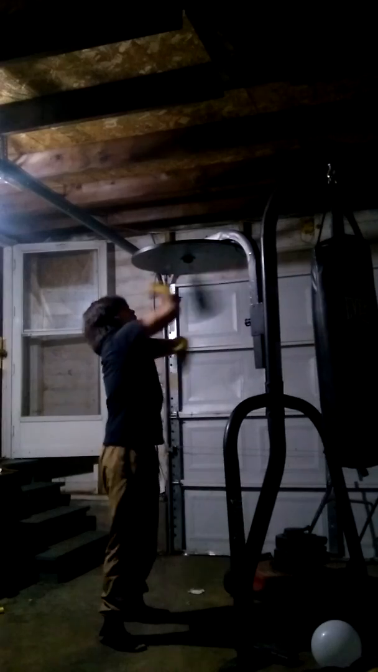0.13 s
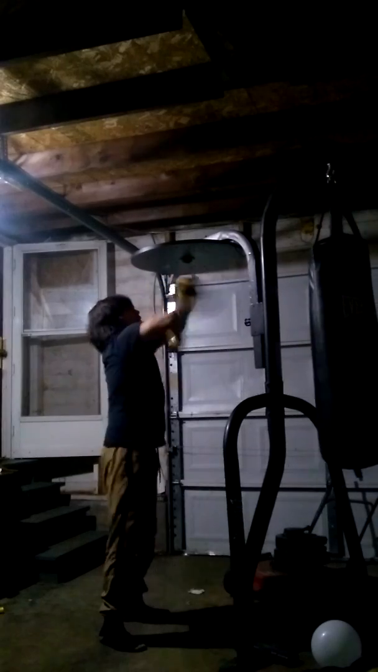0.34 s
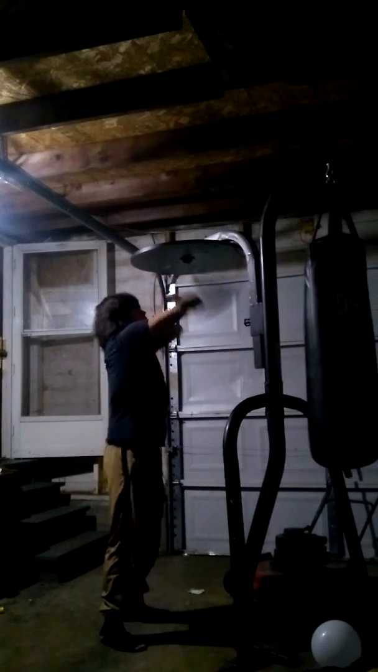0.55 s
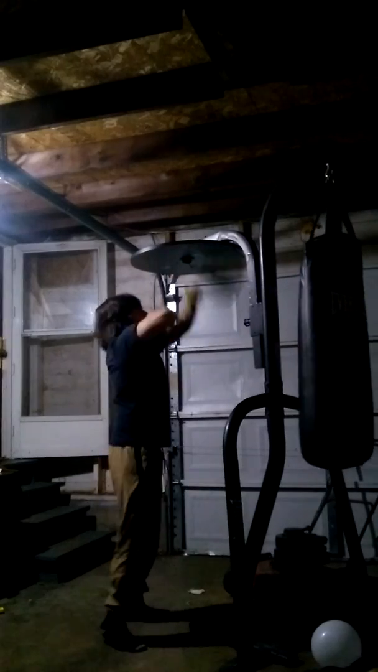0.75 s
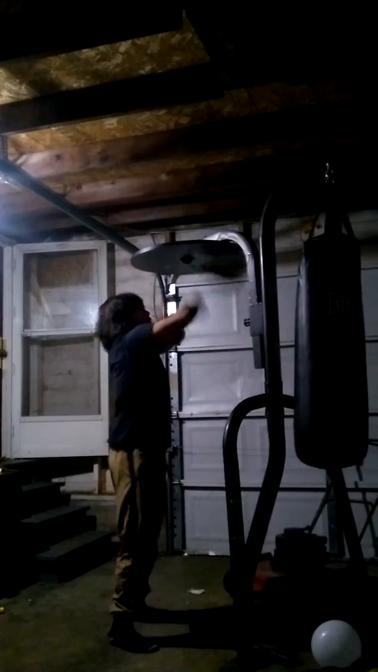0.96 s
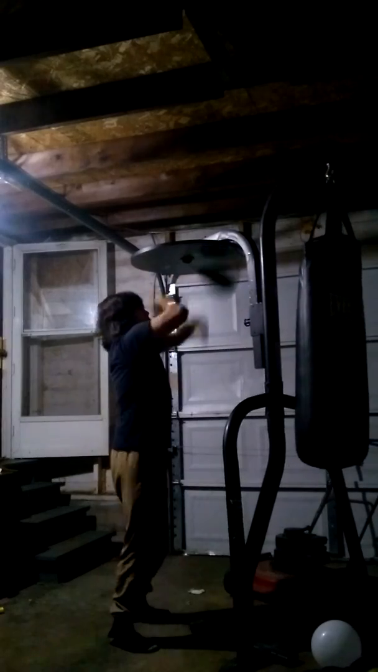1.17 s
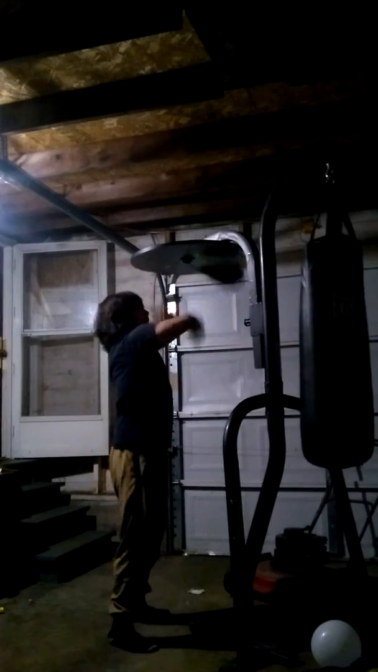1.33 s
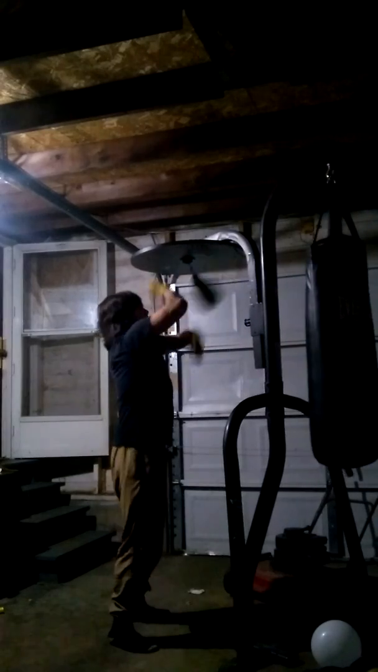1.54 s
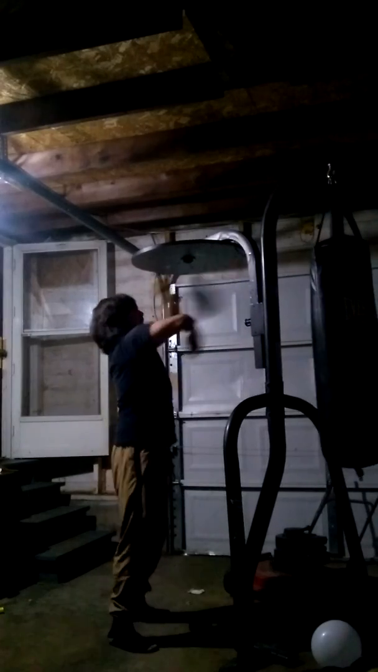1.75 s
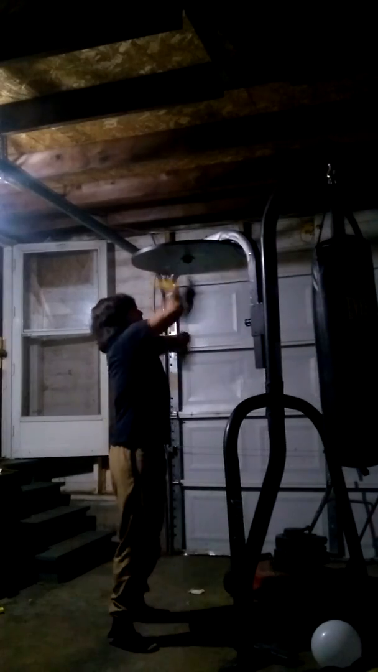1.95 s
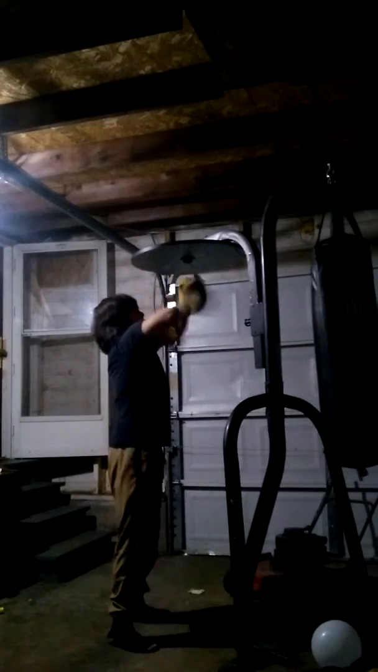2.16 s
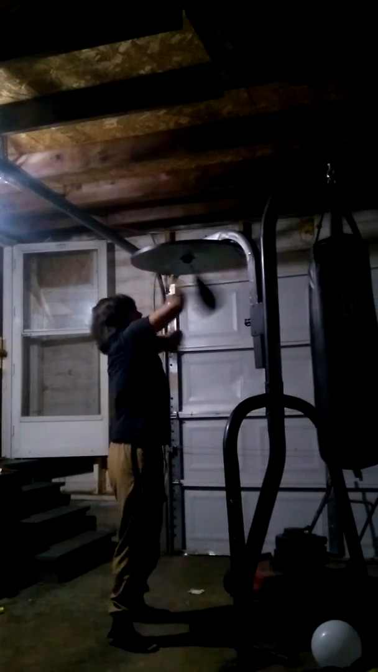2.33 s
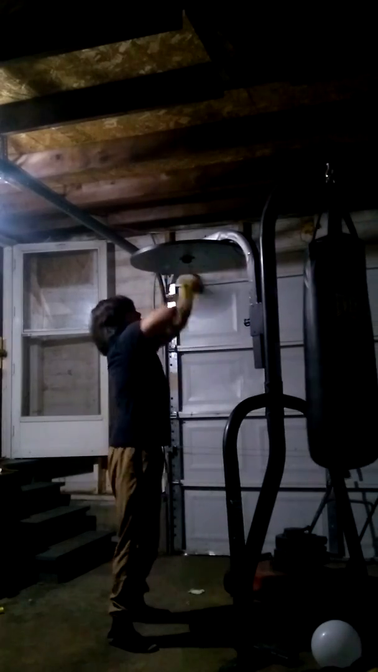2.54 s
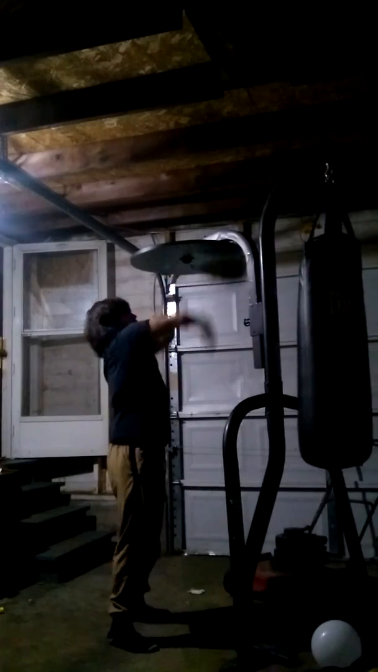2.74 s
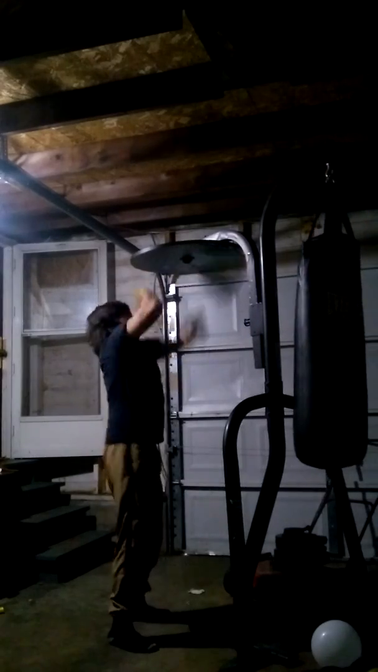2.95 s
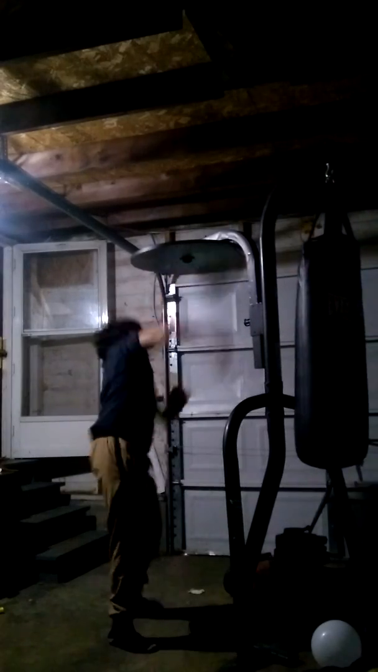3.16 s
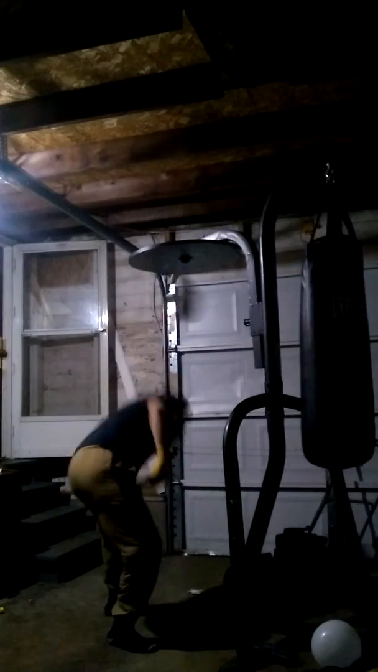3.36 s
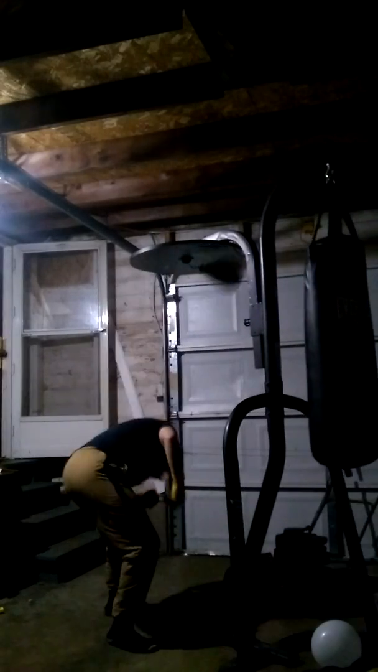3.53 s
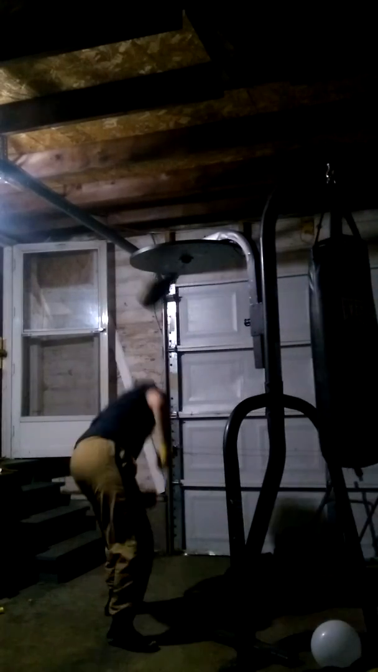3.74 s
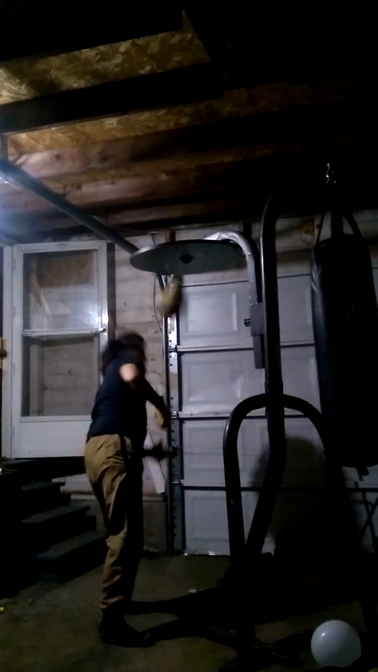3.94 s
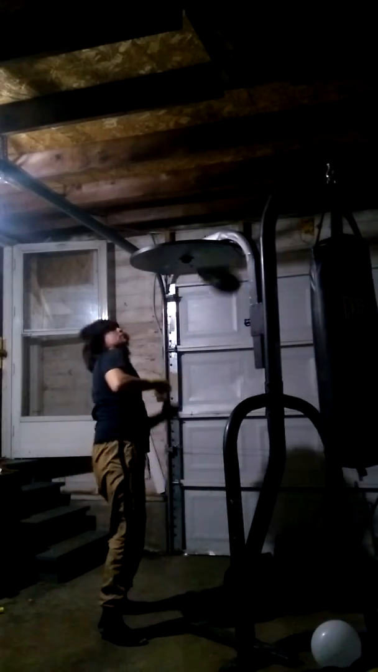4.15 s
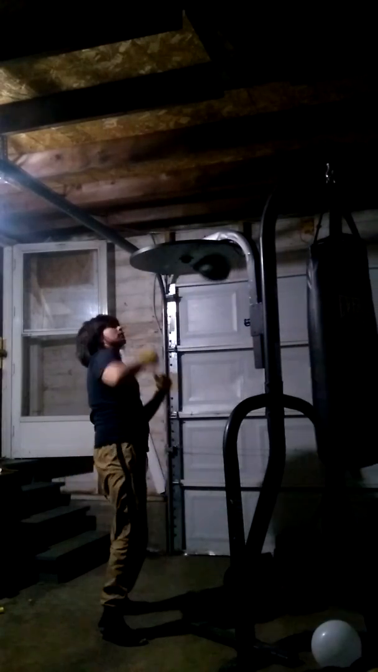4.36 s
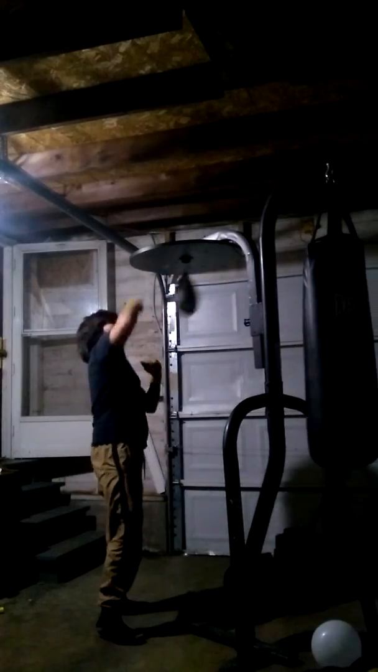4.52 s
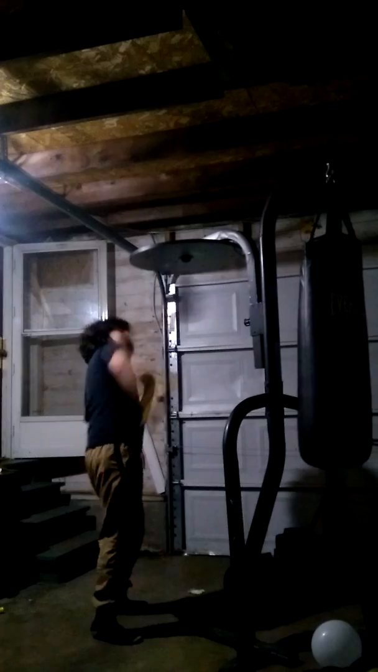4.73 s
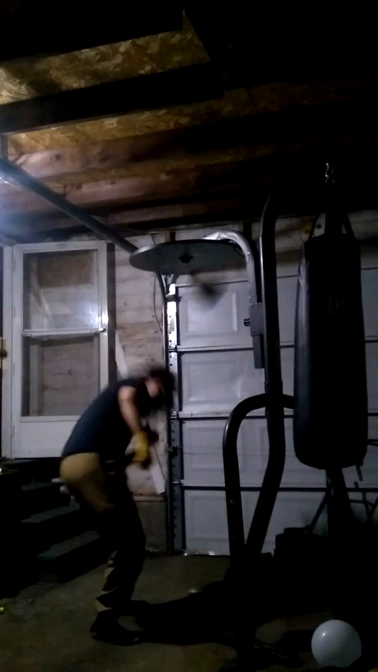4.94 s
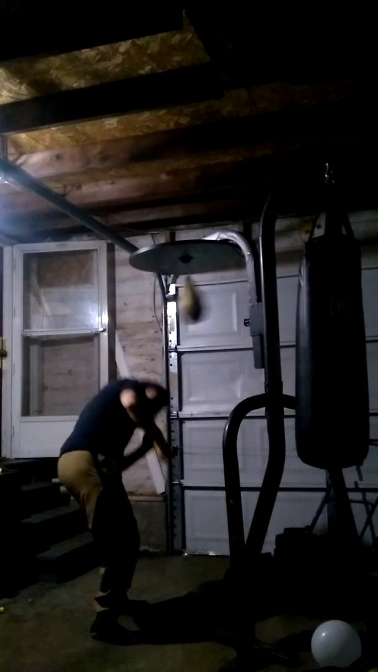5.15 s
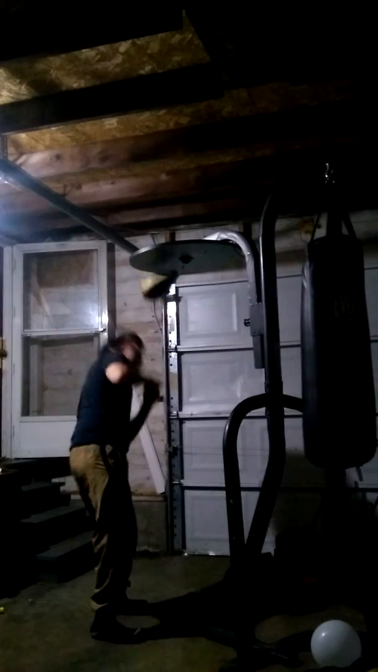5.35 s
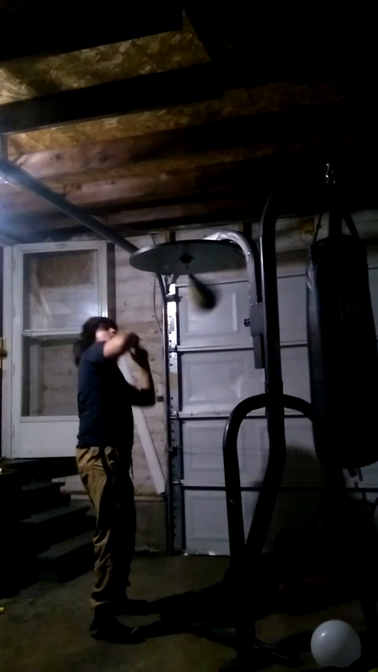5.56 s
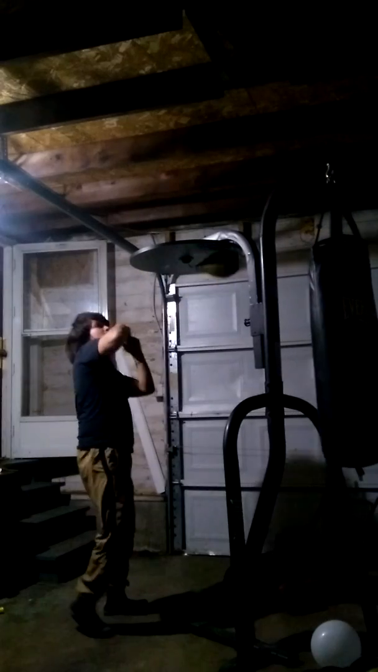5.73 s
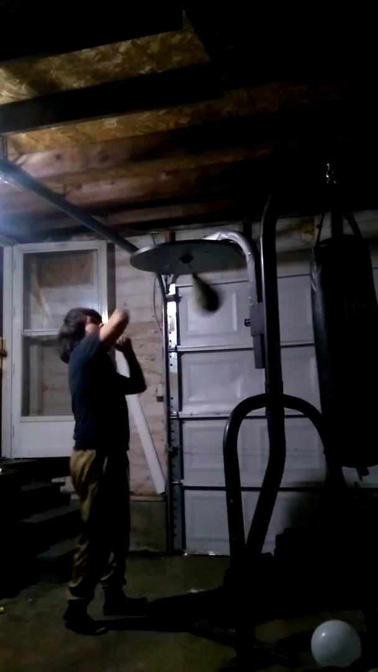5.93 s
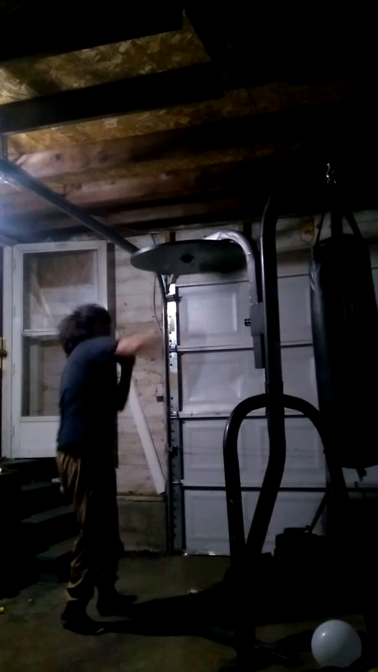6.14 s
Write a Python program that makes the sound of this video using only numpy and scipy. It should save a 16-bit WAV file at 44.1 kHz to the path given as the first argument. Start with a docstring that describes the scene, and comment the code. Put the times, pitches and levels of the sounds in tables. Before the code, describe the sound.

Fast alternating fist hits and board rebounds make a dense hollow drumming with loose metallic clatter. After it ends, small swivel ticks and squeaks, soft cloth movement and one thin upward whistle are heard. A loud crack and thud bursts out, then lighter taps, then another single strike with fading contacts. Close stereo pickup at moderate distance, short hard garage reverberation, low background air.

```python
"""A speed bag is punched in a fast rhythm under its board in a garage, with slaps, thuds and rattles.
Then it swings out: the swivel squeaks, clothes rustle and a rough whistle glides up once.
Two single punches follow, each with a few weaker contacts, over echoes and quiet room tone.
Clicks set the bag, board, stand and swivel ringing; sines make squeaks and knocks; noise makes cloth and air.
Two microphones a hand apart become left and right by delay and subtraction."""
import sys
import numpy as np
from scipy import signal
from scipy.fft import rfft, irfft, next_fast_len
from scipy.io import wavfile

SR = 44100
rng = np.random.default_rng(int(sys.argv[2]) if len(sys.argv) > 2 else 0)


def boost(x):
    """Linear amplitude factor 10**(x/20) for a level x in decibels (scalar or array-like)."""
    u = np.asarray(x, float) / 20
    return 10 ** u


def inscribe(sig):
    """Save sig as 16-bit PCM at rate SR to the path in sys.argv[1].

    A 1-D sig is mono; a 2-D sig holds one channel per row.
    Samples are clipped to [-1, 1] before scaling.
    """
    pcm = np.round(np.clip(np.atleast_2d(sig).T, -1, 1) * 32767)
    wavfile.write(sys.argv[1], SR, pcm.astype(np.int16))


N = 277380   # length in samples
PAD = next_fast_len(N + SR)
HZ = np.maximum(np.fft.rfftfreq(PAD, 1 / SR), 1)
PATTERNS = 6   # number of different echo and ringing patterns, dealt to the events in turn

# All levels in the tables are relative: the mix sets how loud each layer ends up.
# The fist meets the bag: start_s, strength_db, swivel_rattle_db, contact_length_s, bag_ring_db
FISTS = [(0.204, -7, -2, 0.0015, -19.5), (0.392, 0, -2.5, 0.0027, -18), (0.747, -1, -20, 0.0029, -27),
         (0.925, -2, -24, 0.0056, -19.5), (1.297, -1, -30, 0.003, -14), (1.477, -15.5, -16, 0.0021, -15.5),
         (1.674, -1.5, -23.5, 0.012, -20), (1.842, 3, 6.5, 0.01, -14), (2.21, -18.5, -43, 0.01, -26.5),
         (2.369, -4.5, -33, 0.0049, -13.5), (2.566, -11, -32, 0.02, -46), (3.927, 4.5, 0, 0.01, -9.5),
         (3.943, -4, -2, 0.043, -24), (5.4, -2.5, -4.5, 0.017, -14.5), (5.614, -17, -26, .01, -24.5)]
# The bag rebounds off the board:
# flat_slap_s, strength_db, stand_boom_db, flat_slap_db, contact_length_s, extra_thud_db
REBOUNDS = [(0.006, -6.5, -29, -44, 0.025, 5), (0.096, 0.5, -19.5, -3, 0.018, 2),
            (0.289, 1.5, -19, -8, 0.026, 4), (0.471, 5.5, -23.5, 5, 0.0066, 2.5),
            (0.639, 6, -21.5, -1, 0.03, 1), (0.7468, -3, -30, -3, 0.0065, -7),
            (0.8166, 4, -23, 5.5, 0.0084, 0.5), (1.007, 2.5, -14.5, 7.5, 0.0079, 6),
            (1.189, 7, -17, 4.5, 0.0095, -2.5), (1.3879, 5.5, -18.5, 8.5, 0.014, -1.7),
            (1.582, -0.5, -27.5, -4, 0.018, 3), (1.759, 2.5, -16, -32, 0.0055, 2.5),
            (1.9217, 7.5, -12, 2.5, 0.016, 4.2), (2.0845, 1.5, -24, 13, 0.0064, -1.5),
            (2.274, 5, -18, 7, 0.012, -2.5), (2.437, 6, -17, 11.5, 0.014, -5),
            (3.9718, 8, -23, -16, 0.00046, -3), (3.979, 0.5, -20, 16, .007, -13.5),
            (4.319, -15, -36.5, -29, 0.017, -12.5), (4.472, -16, -58, -28, 0.0084, -9),
            (4.624, -23, -53.5, -28, 0.0079, -4), (5.434, -3, -16.5, -18.5, 0.016, 4),
            (5.4663, 6.5, -22.5, 19, 0.0053, -8), (5.617, -12, -33, -38, 0.012, 1.5),
            (5.8618, -16, -39.5, -18, 0.0059, 3), (6.21, -21.5, -56, -35, 0.009, -3)]
# The swivel clatters as the bag swings: start_s, knock_db, rattle_db, length_s
CLATTER = [(0.44, -6, 6, 0.025), (0.719, -29, 7.5, 0.011), (0.949, 0, 7.5, 0.041), (1.155, 0.5, 1, 0.052),
           (1.346, -1, 9.5, 0.1), (1.723, 1.5, 3, 0.024), (2.611, -19, 0, 0.011),
           (2.79, -20.5, -24.5, 0.018), (2.839, -23, -29, 0.012), (2.925, -34, -28, 0.0059),
           (3.025, -40, -28, 0.025), (3.1, -19, -10.5, 0.02), (3.158, -22, -19.5, 0.011),
           (3.232, -23.5, -16.5, 0.0068), (3.438, -29, -22, 0.019), (3.631, -37.5, -27, 0.0032),
           (3.813, -36, -22, 0.14), (3.997, -27, 10, 0.0019), (4.014, -23, -7, 0.0052),
           (4.611, -21, -33, 0.016), (4.659, -24, -20, 0.0038), (4.925, -49, -22, 0.01),
           (4.971, -20.5, -24.5, 0.027), (5.25, -38, -47, 0.021), (5.459, -6, 12, 0.0011),
           (5.509, -22, 3, 0.012), (5.812, -23.5, -29, 0.0091), (5.833, -15.5, -15.5, 0.021),
           (5.994, -22, -25, 0.01), (6.17, -30.5, -31, 0.011)]
# Ringing of the air in the bag: pitch_hz, level_db, t60_s (time to fall 60 dB, before shortening)
BAG_MODES = [(266, -22, 0.22), (337, 8, 0.061), (470, -3.5, 0.096)]
# Ringing of the rebound board: pitch_hz, level_db, t60_s (before shortening)
BOARD_MODES = [(298, 3, 0.38), (368, -0.5, 0.13), (429, -12, 0.026), (452, 6, 0.37), (455, -9, 0.2),
               (590, 3, 0.26), (597, 6.5, 0.13), (855, -21.5, 0.28), (890.5, 5, 0.19), (1080, 1.5, 0.037),
               (1218, 16, 0.037), (1248, 13.5, 0.027), (1755, -15.5, 0.017)]
# Ringing of the stand: pitch_hz, level_db, t60_s (before shortening)
STAND_MODES = [(95, -5.5, 0.5), (112.4, 0.5, 0.23), (150.4, 6, 0.14), (168, -7, 0.53)]
# Colour of the swivel's rattle: frequency_hz, level_db (per Hz)
RATTLE_COLOUR = [(1500, -15), (2200, 16.5), (3200, 3), (4500, 10.5), (6200, -15.5), (8300, 0.5),
                 (10000, -20), (12000, -14.5), (14000, -13), (16000, -9.5)]
# Hollow knocks that stand out of the rattle: start_s, pitch_hz (before detuning), level_db, t60_s
KNOCKS = [(.648, 600, -17.5, 0.036), (.755, 640, -16.5, 0.042), (.822, 1012, -16, 0.073),
          (1.021, 435, -15.5, 0.039), (1.117, 740, -23, 0.053), (1.188, 480, -16.5, 0.056),
          (1.192, 838, -14.5, 0.13), (1.384, 926, -13.5, 0.044), (1.401, 452, -13.5, 0.051),
          (1.764, 387, -17.5, 0.034), (1.929, 773, -15, 0.046), (1.959, 442, -20.5, 0.1),
          (2.287, 450, -17, .04), (2.443, 520, -17, .06), (3.9715, 640, -6.5, 0.026),
          (3.987, 520, -15, 0.023), (4.358, 1205, -32.5, 0.06), (4.494, 792, -34, 0.12),
          (4.673, 1205, -44, .05), (4.988, 466, -44, .08), (5.481, 820, -15.5, 0.075),
          (5.498, 570, -29, 0.075), (6.232, 1055, -46, .05)]
# Swivel squeaks: start_s, pitch_hz (before wavering), level_db, length_s
SQUEAKS = [(2.628, 1737, -32, 0.058), (3.106, 1255, -34.5, 0.035), (2.832, 2090, -37.5, 0.058),
           (2.836, 1210, -32.5, 0.021), (2.87, 1236, -39, 0.023), (2.925, 601, -36.5, 0.054),
           (3.393, 599, -47, 0.086), (4.47, 983, -34, 0.038), (4.477, 593, -39, 0.087),
           (5.125, 596, -44, 0.065), (5.188, 610, -50, 0.05), (6.006, 768, -42, 0.041),
           (6.154, 421, -42, 0.04), (6.217, 326, -42, 0.029)]
# Clothes and shoes rustle as the boxer ducks and rises: time_s, level_db (before fluttering)
RUSTLE = [(2.7, -51), (2.88, -42), (3.14, -42.5), (3.45, -78), (3.82, -53), (4.099, -42), (4.561, -47),
          (4.8, -61.5), (4.93, -80), (5.1, -59.5), (5.55, -51), (5.71, -39.5), (5.98, -65), (6.29, -53)]
# How long the garage rings: frequency_hz, t60_s
ROOM_T60 = [(80, 0.27), (210, 0.62), (560, 0.53), (1470, 0.55), (3880, 0.48), (10200, 0.39)]
# How alike sound from all sides is at the two microphones: frequency_hz, likeness (-1 to 1)
ALIKE = [(100, 0.99), (400, 0.93), (800, 0.69), (1200, 1), (1800, -0.25), (3000, -0.033), (6000, -0.03),
         (9000, 0.39)]
# Colour of the room tone: frequency_hz, level_db (per Hz)
AIR_COLOUR = [(35, -33.5), (60, -5.5), (144, -1.5), (364, -15.5), (960, -4.5), (1790, -15), (2360, -21),
              (3420, -19.5), (4950, -26), (15000, -28.5)]
# Level of the first microphone over the second: frequency_hz, level_db
MISMATCH = [(60, -2.5), (200, 2), (700, -0.5), (1400, -4.5), (3000, 7), (7000, -15.5), (12000, -10)]
# Share of the other microphone taken off: frequency_hz, share (0 to 1)
SUBTRACT = [(100, 0.94), (600, 0.36), (1250, 0), (2500, 0.88), (5000, 0.32), (7400, 0.63), (9500, 0.49),
            (13000, 0.42)]


def unit(x):
    """Scales each row to energy 1."""
    return x / np.sqrt(np.sum(x ** 2, axis=-1, keepdims=True) + 1e-20)


def at_hz(points, hz):
    """Reads a table along straight lines on a log-frequency axis."""
    return np.interp(np.log(hz), np.log(np.array(points)[:, 0]), np.array(points)[:, 1])


def through(x, response):
    """Sends sound through a body or room: convolution along time."""
    return signal.fftconvolve(x, response, axes=-1)[..., :N]


def band(x, low_hz, high_hz):
    """Keeps the sound between two frequencies."""
    sos = signal.butter(2, [low_hz, min(high_hz, .45 * SR)], "band", fs=SR, output="sos")
    return signal.sosfilt(sos, x)


def wobble(low_hz, high_hz):
    """Noise between two frequencies, rms 1."""
    return unit(band(rng.standard_normal(N), low_hz, high_hz)) * np.sqrt(N)


def modes(table, shorter):
    """Answer of a struck body: dying sines, with other strengths in each pattern."""
    t = np.arange(SR // 2) / SR
    shares_db = 2.5 * rng.standard_normal((len(table), PATTERNS, 1))
    ringing = 0
    for (hz, db, t60), share_db in zip(table, shares_db):
        fading = boost(db + share_db - 60 * t / (t60 * shorter))
        ringing = ringing + fading * np.sin(2 * np.pi * hz * t)
    return unit(ringing)


def bursts(times, level_db, lengths, grain_db, steady=0, size=8000):
    """Each event is a clump of uneven clicks, or a smoother push, that swells and dies.

    Events take the patterns in turn; steady runs from 0 (clicks) to 1 (smooth push)."""
    out = np.zeros((PATTERNS, N + size))
    x = np.arange(size) / SR / np.maximum(lengths, 1e-4)[:, None]
    shape = x ** 0.5 * np.exp(-x)
    sizes = boost(grain_db * np.minimum(rng.exponential(1, (len(times), size)), 4))
    clicks = rng.standard_normal((len(times), size)) * sizes
    grains = (steady + (1 - steady) * clicks) * shape
    if not steady:
        for _ in range(2):   # flatten the spectrum, keep the shape in time
            spectrum = rfft(grains)
            grains = irfft(spectrum / (np.abs(spectrum) + 1e-9)) * shape ** .25
    for k, (s, db, grain) in enumerate(zip(times, level_db, unit(grains))):
        at = round(max(s, 0) * SR)
        out[k % PATTERNS, at:at + size] += boost(db) * grain
    return out[:, :N]


def punches():
    """A soft push of the fist sets the air in the bag ringing."""
    s, *_, ring_db = np.transpose(FISTS)
    push = bursts(s + 0.0011, ring_db, np.full(len(s), .0004), grain_db=1.5, steady=0.65, size=512)
    return through(push, modes(BAG_MODES, shorter=0.93))


def slaps():
    """A sudden push of air (clap) with a short crack on it."""
    s, _, _, crack_db, _, _ = np.transpose(REBOUNDS)
    clap_db = crack_db - 1.5
    push = bursts(s, clap_db, np.full(len(s), .00015), grain_db=0, steady=1, size=512)
    crack = bursts(s, crack_db, np.full(len(s), .00012), grain_db=0.0, size=512)
    return band(crack, 5000, 13000) - band(push, 433, 3700)


def contacts():
    """All contacts in order of time: start_s, boom_db, thud_db, knock_db, rattle_db, length_s."""
    s, db, boom_db, _, length, extra_db = np.transpose(REBOUNDS)
    start = s - .4 * length   # the contact begins before the flat slap
    board = [start, boom_db, db - 3.5 + extra_db, db - 2, db + 5.5, length]
    s, db, rattle_db, length, _ = np.transpose(FISTS)
    fist = [s, db - 23, db, db - 8.5, rattle_db, length]
    s, db, rattle_db, length = np.transpose(CLATTER)
    loose = [s, db - 46, db - 1.5, db, rattle_db, length]
    rows = np.hstack([board, fist, loose])
    return rows[:, np.argsort(rows[0])]


def board(hits):
    """The board answers the first touch, then thuds (low modes) and knocks (high modes)."""
    s, _, thud_db, knock_db, _, length = hits
    click = np.eye(1, SR // 2)
    # each answer is ringing plus a short puff
    soft = modes([mode for mode in BOARD_MODES if mode[0] < 700], shorter=.36)
    soft = soft + 1.6 * unit(band(click, 250, 680))
    hard = modes([mode for mode in BOARD_MODES if mode[0] > 700], shorter=.45)
    hard = hard + 2.2 * unit(band(click, 650, 1900))
    touch = bursts(s + 0.00321, thud_db - 27.5, np.full(len(s), .0003), grain_db=-3.5, steady=0.27, size=512)
    first_touch = through(touch, soft + 0.59 * hard)
    thud = through(bursts(s, thud_db, .9 * length, grain_db=3.5), soft)
    knock = through(bursts(s, knock_db, .9 * length, grain_db=6), hard)
    return first_touch, thud + knock


def stand(hits):
    """A short push at every contact makes the stand boom at its low modes."""
    s, boom_db, *_ = hits
    push = bursts(s + 0.0058, boom_db, np.full(len(s), .0008), grain_db=-2, steady=0.68, size=1024)
    return through(push, modes(STAND_MODES, shorter=0.74))


def swivel_rattle(hits):
    """Uneven clicks at every contact take on the colour of the loose metal."""
    s, *_, rattle_db, length = hits
    click = np.eye(1, SR // 2)
    metal = 0
    for k, low_hz in enumerate(1200 * 2 ** np.arange(0, 4, .5)):
        level = boost(at_hz(RATTLE_COLOUR, low_hz * 1.211))
        metal = metal + level * band(click, low_hz, low_hz * np.sqrt(2)) * (-1) ** k
    return through(bursts(s, rattle_db, 1.1 * length, grain_db=6), unit(metal))


def knocks():
    """Hollow damped tones with a quick rise, and a hum at each punch that swells more slowly."""
    rows = [(*row, 0.0021) for row in KNOCKS]   # last column: rise in s
    # each punch also gets a hum near 346 Hz that swells for 24 ms, then dies fast
    s, *_, ring_db = np.transpose(FISTS)
    rows += [(start, 346, db - 7, .04, .024) for start, db in zip(s, ring_db)]
    t = np.arange(SR // 4) / SR
    out = np.zeros((PATTERNS, N + len(t)))
    detunes = rng.normal(1, .01, len(rows))
    for k, ((s, hz, db, t60, rise), detune) in enumerate(zip(rows, detunes)):
        shape = np.minimum(t / rise, 1) ** .5 * boost(db - 60 * np.maximum(t - rise, 0) / t60)
        at = round(s * SR)
        out[k % PATTERNS, at:at + len(t)] += shape * np.sin(2 * np.pi * hz * detune * t)
    return out[:, :N]


def squeaks():
    """Short rough swivel tones: sines whose pitch wavers and whose level flutters."""
    t = np.arange(N) / SR
    clock = np.cumsum(1 + .016 * wobble(3.3, 66)) / SR   # time that runs unevenly
    rough = 1 + .6 * wobble(22, 92)
    out = np.zeros(N)
    for s, hz, db, length in SQUEAKS:
        x = np.clip((t - s) / length, 0, 1)
        out += boost(db) * rough * np.sin(np.pi * x ** 0.89) * np.sin(2 * np.pi * hz * clock)
    return out


def whistle():
    """While the bag swings free, one fluttering sine glides up, its pitch shaken by noise."""
    age = np.arange(N) / SR - 3.01   # seconds since its start
    swell_s, hold_s, fade_db_per_s = 0.018, 0.15, 82.5
    fade_db = fade_db_per_s * np.maximum(age - swell_s - hold_s, 0)
    level = np.clip(age / swell_s, 0, 1) * boost(-37.5 - fade_db)
    pitch_hz = 990 + 1300 * np.clip(age, 0, .24) + 40 * wobble(8, 60)
    glide = np.sin(2 * np.pi * np.cumsum(pitch_hz) / SR)
    return level * np.sqrt(2) * (.6 + .6 * wobble(12, 90)) * glide


def rustle():
    """Clothes and shoes: lumpy mid-range noise with a little cloth hiss."""
    s, db = np.transpose(RUSTLE)
    level_db = np.interp(np.arange(N) / SR, s, db, -120) + 3.1 * wobble(4.8, 30)
    cloth = band(wobble(330, 1430), 220, 1500)
    hiss = boost(-21) * wobble(2800, 9400)
    return boost(level_db) * (cloth + hiss)


def diffuse(sum_and_difference):
    """Makes two noises as alike at the spaced microphones as sound from all sides is."""
    alike = np.clip(at_hz(ALIKE, HZ), -1, 1)
    common, apart = rfft(sum_and_difference, PAD) * np.sqrt([1 + alike, 1 - alike])
    return irfft([common + apart, common - apart], PAD)[:, :N] / np.sqrt(2)


def garage(patterns):
    """Reflections build up after a short gap and die band by band."""
    t = np.arange(SR) / SR
    white = rng.standard_normal((2, 2, PATTERNS, SR))
    # the first reflections stand apart, later ones blend
    white = white * boost(2.8 * np.exp(-t / .04) * rng.exponential(1, (PATTERNS, SR)))
    build_up = np.clip((t - .004) / 0.0021, 0, 1)
    tail = 0
    for k, low_hz in enumerate(45 * 2 ** np.arange(0, 9, .5)):
        t60 = at_hz(ROOM_T60, low_hz * 1.24)
        dying = band(white[k % 2], low_hz, low_hz * np.sqrt(2)) * boost(-60 * t / t60) * build_up
        tail = tail + unit(dying) * np.sqrt(low_hz * t60)   # energy grows with bandwidth and decay time
    return diffuse([through(patterns, side).sum(axis=0) for side in unit(tail)])


def air():
    """Quiet room tone: coloured noise with a slowly uneven level."""
    white = rfft(rng.standard_normal((2, N)), PAD)
    coloured = irfft(white * boost(at_hz(AIR_COLOUR, HZ)), PAD)[:, :N]
    level = boost(-58 + 1.8 * wobble(0.97, 4.9))
    return level * np.sqrt(N) * unit(diffuse(coloured))


def scene():
    """Direct sound, its reflections and the room tone at two microphones."""
    hits = contacts()
    slap, hollow = slaps(), knocks()
    first_touch, board_body = board(hits)
    boom = stand(hits) + first_touch + punches()
    body = board_body + swivel_rattle(hits)
    small = squeaks() + whistle() + rustle()
    # the slap comes back once from a near surface, 11 ms later
    echo = boost(-14) * np.roll(band(slap, 400, 7800), round(0.011 * SR), axis=-1)
    direct = (echo + slap + boom + hollow + boost(-7.5) * body).sum(axis=0) + boost(-5.0) * small
    lag = np.exp(2j * np.pi * HZ * .00005)   # the bag hangs a little to one side
    both = irfft(rfft(direct, PAD) * np.array([lag, lag ** 0]), PAD)[:, :N]
    dulled = band(slap, 340, 9500)   # the slap beams its top; the walls get less of it
    to_walls = boost(-5.0) * dulled + boost(2.0) * boom + body + boost(-7.5) * hollow + boost(-15.5) * small
    return both + garage(to_walls) + air()


def band_limit(x):
    """A steep low-pass at the top of the band."""
    return signal.sosfilt(signal.butter(12, 16380, fs=SR, output="sos"), x)


def record(dry):
    """Each side is one microphone minus the delayed other; bass is lifted, ends cut, peaks clip."""
    first, second = rfft(dry, PAD) * boost(np.outer([.5, -.5], at_hz(MISMATCH, HZ)))
    spacing_s = 0.0004087   # sound travel between the microphones
    late = at_hz(SUBTRACT, HZ) * np.exp(-2j * np.pi * HZ * spacing_s)
    lift = (1j * HZ + 500) / (1j * HZ + 90)   # gives back bass lost in the subtraction
    left, right = (first - late * second) * lift, (second - late * first) * lift
    sides = irfft([left, right], PAD)[:, :N] * boost(-6.0)
    sides = signal.sosfilt(signal.butter(4, 82, "high", fs=SR, output="sos"), sides)
    clipped = np.clip(sides, -1, 1)
    mix = signal.sosfilt(signal.butter(8, 15200, fs=SR, output="sos"), clipped)
    return band_limit(mix)


dry = scene()
out = record(dry)
inscribe(out)
```